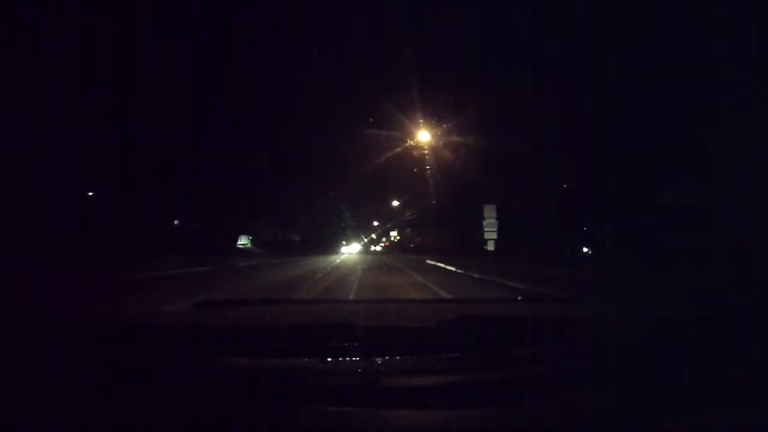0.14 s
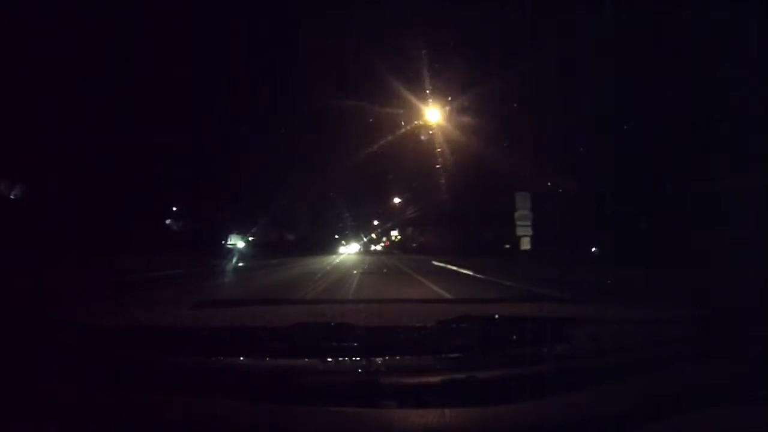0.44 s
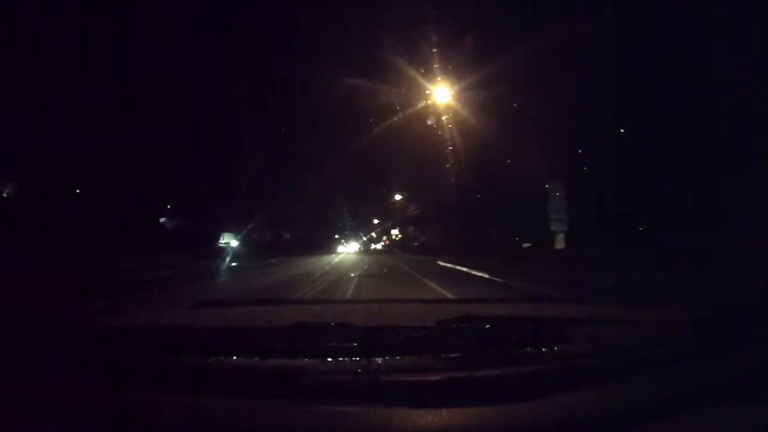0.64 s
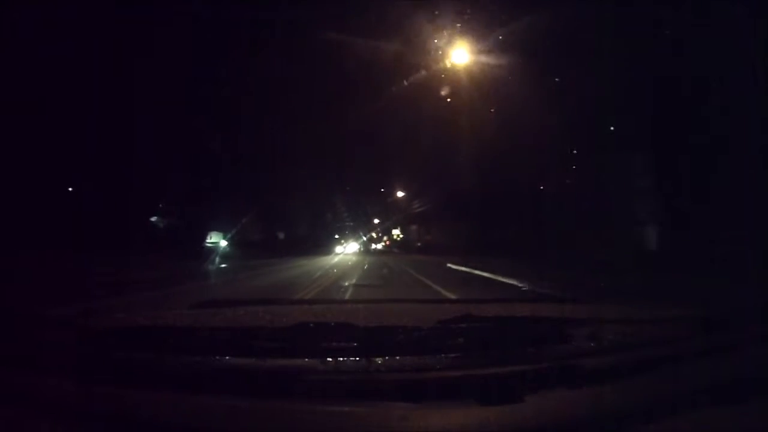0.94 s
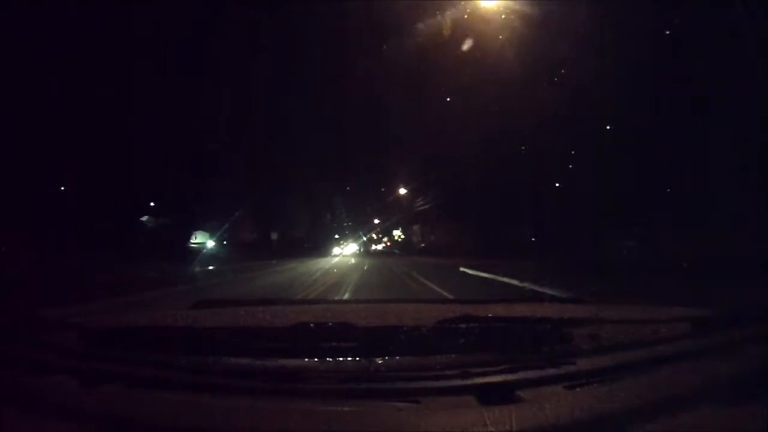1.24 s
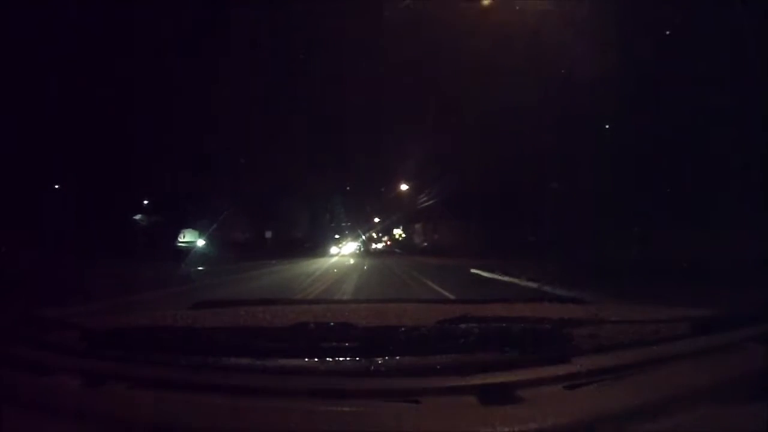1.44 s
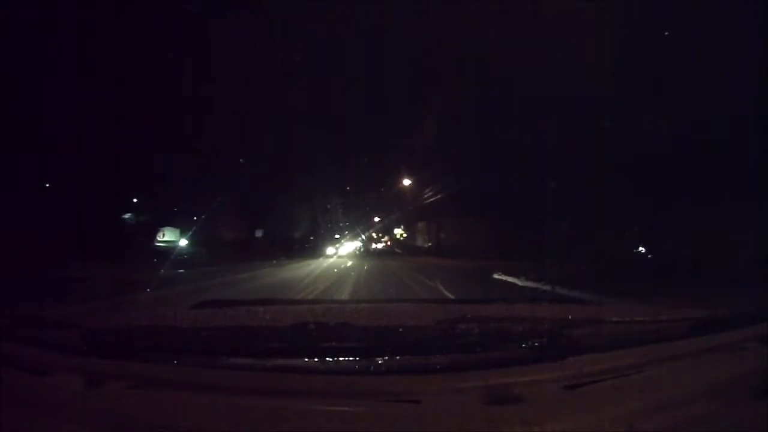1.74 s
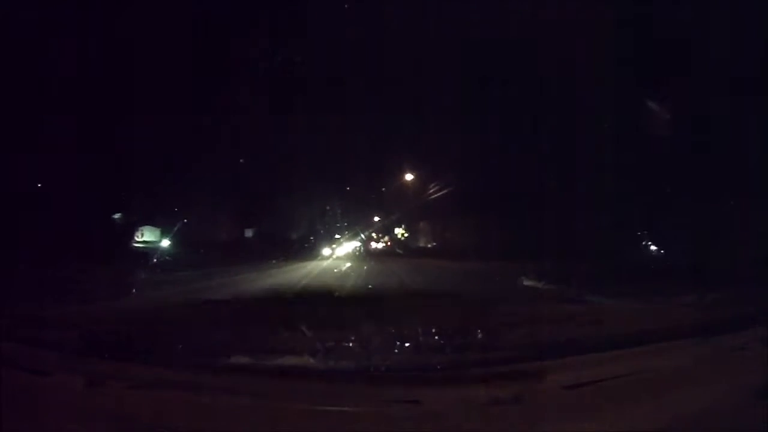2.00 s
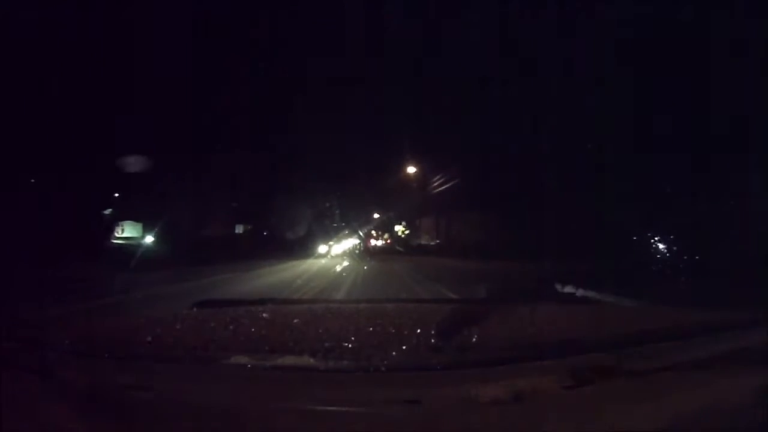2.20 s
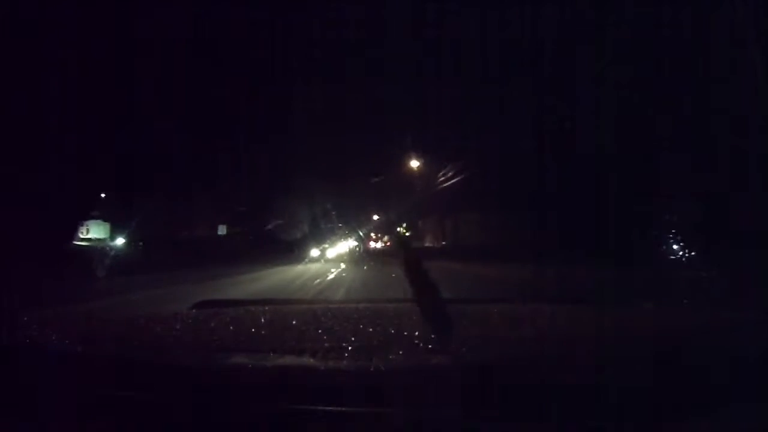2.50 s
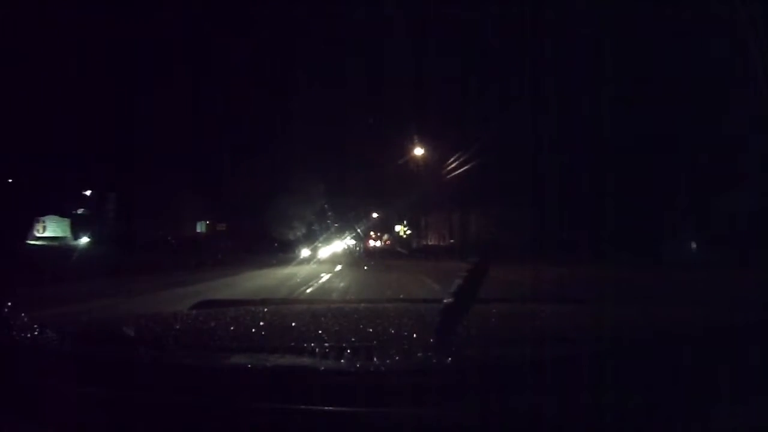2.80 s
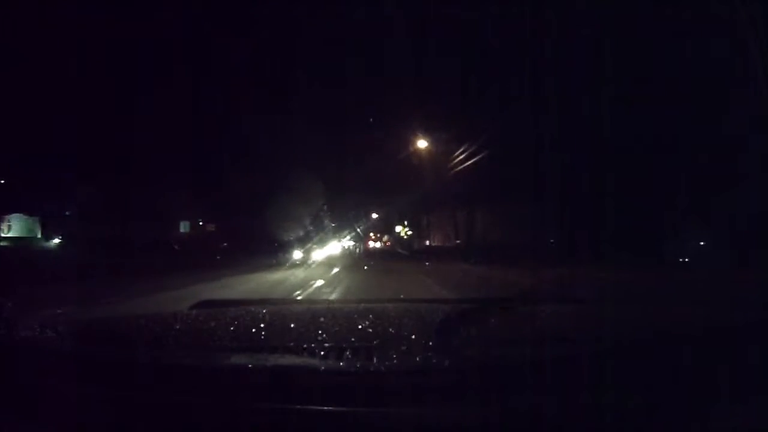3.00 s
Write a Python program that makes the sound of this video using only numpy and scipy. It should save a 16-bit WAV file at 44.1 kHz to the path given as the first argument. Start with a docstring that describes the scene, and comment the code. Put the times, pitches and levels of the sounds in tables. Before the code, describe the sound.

Inside a cruising car, a low engine hum sits under heavy tyre roar and boomy body rumble; two soft bumps thud around two seconds, with faint trim ticks, heard from a dashboard microphone.

```python
"""Inside a cruising car

The engine hums as orders 2 to 5 of its turning rate; it sags in speed and eases off near the end.
Tyre noise roars through cabin resonances, drones and shakes the body; two bumps push the cabin air.
Shaped noise makes the air hiss and the ticks and creaks of the trim. At the dashboard, a limiter ducks
after each peak, big bass swings are rounded off and a thin sizzle lies in the top treble.
"""
import sys
import numpy as np
from scipy import signal
from scipy.fft import rfft, irfft
from scipy.io import wavfile
from scipy.ndimage import uniform_filter1d

SR = 44100
rng = np.random.default_rng(int(sys.argv[2]) if len(sys.argv) > 2 else 0)


def file_out(sig):
    """Save sig as 16-bit WAV at sys.argv[1]."""
    # one column per channel
    cols = np.atleast_2d(sig).T
    # limit, then scale
    lim = np.clip(cols, -1, 1)
    pcm = np.round(lim * 32767).astype(np.int16)
    wavfile.write(sys.argv[1], SR, pcm)


N = 138915
TIME = np.arange(N) / SR  # s
FREQS = np.maximum(np.arange(N // 2 + 1) * SR / N, 1)  # Hz


def from_db(db):
    """Decibels to amplitude gain."""
    return 10 ** (np.asarray(db) / 20)


def in_time(rows):
    """Each column of a time curve, interpolated at every sample."""
    s, *columns = np.transpose(rows)
    return [np.interp(TIME, s, column) for column in columns]


def over_hz(points):
    """A spectrum in dB at every bin, interpolated over log frequency."""
    hz, db = np.transpose(points)
    return np.interp(np.log(FREQS), np.log(hz), db)


def bell(hz, width_hz, db):
    """A Gaussian peak or dip in dB, with its full width at half its dB height."""
    return db * .5 ** ((2 * (FREQS - hz) / width_hz) ** 2)


def noise(db_per_hz):
    """Steady Gaussian noise of the given spectral density."""
    white_spectrum = rfft(rng.standard_normal(N))
    return irfft(white_spectrum * from_db(db_per_hz) * np.sqrt(SR / 2), N)


def drift(rate_hz):
    """Low-passed random variation with a standard deviation of 1."""
    slow = irfft(rfft(rng.standard_normal(N)) / (1 + (FREQS / rate_hz) ** 2), N)
    return slow / slow.std()


def evened(x):
    """The same sound with its chance swells levelled by a twice-smoothed power."""
    window = int(0.15 * SR)  # 0.15 s
    power = uniform_filter1d(uniform_filter1d(x ** 2, window), window)
    return x * np.sqrt(np.mean(x ** 2) / power)


def engine():
    """Orders 2 to 5 of the crankshaft: sines at multiples of the turning rate."""
    # speed and order levels before trim: (time [s], turning rate [Hz],
    # order 2 [dB], order 3 [dB], order 4 [dB], order 5 [dB])
    speed_and_orders = [(0,27.4,-20.5,-24.5,-20.5,-33),(.12,28.25,-15.5,-20.5,-29,-39),(.48,28.68,-17,-19.5,-38,-38),(.78,28.4,-18,-22,-37.5,-35),(1.03,27.41,-24,-19,-29.5,-36),(1.4,27.86,-18.5,-20.5,-45,-39.5),(1.6,27.45,-19.5,-20.5,-34,-46),(1.7,26.4,-20,-17.5,-26.5,-28.5),(1.9,25.33,-22.5,-22,-23.5,-29),(2.19,25.09,-22.5,-22,-27.5,-26.5),(2.38,26.08,-22,-19.5,-23.5,-26.5),(2.55,27.55,-18.5,-20,-32,-49),(2.72,27.13,-35,-21,-27,-33),(2.88,25.6,-29,-44,-29.5,-29),(3.04,24.6,-37,-31,-43,-30),(3.15,24.9,-43,-32,-16,-28)]
    trims_db = [2, 2, 1, 1]
    turn_hz, *levels_db = in_time(speed_and_orders)
    turn_rad = 2 * np.pi * np.cumsum(turn_hz) / SR
    hum = 0
    for order, (level_db, trim_db) in enumerate(zip(levels_db, trims_db), start=2):
        start_rad = 2 * np.pi * rng.random()
        hum = hum + from_db(level_db + trim_db) * np.sin(order * turn_rad + start_rad)
    return hum


def tyre_roar():
    """Road texture excites cabin resonances, which waver in pitch as the roar runs early or late."""
    # tyre noise through the body: (frequency [Hz], density [dB per Hz])
    body_noise = [(150,-80),(260,-57.5),(370,-62.5),(620,-66),(950,-77),(1450,-78),(1650,-99.5),(3000,-110)]
    # cabin resonances: (frequency [Hz], width [Hz], lift [dB])
    cabin_modes = [(305.4,53,5),(429,46,4),(527,64,9),(695,47,7.5),(811,66,7),(892,49,5),(1083,80,8.5),(1174,52,9.5),(1349,146,8)]
    # roar strength, used relative to its mean: (time [s], level [dB])
    roar_level = [(0,-31),(.09,-33),(.16,-30),(.25,-31.5),(.35,-32.5),(.48,-31),(.72,-33),(.85,-32),(.92,-29.5),(1.05,-32.5),(1.16,-28.5),(1.24,-32.5),(1.42,-30),(1.54,-33),(1.66,-28.5),(1.8,-31),(1.9,-28.5),(1.99,-31.5),(2.08,-26.5),(2.21,-30.5),(2.3,-28.5),(2.46,-28),(2.52,-31),(2.66,-28),(2.8,-27.5),(2.87,-28.5),(2.95,-28),(3.15,-27.5)]
    flutter_db, flutter_hz = 0.84, 64
    waver_s, waver_hz = 0.0005, 4
    resonances_db = sum(bell(*mode) for mode in cabin_modes)
    roar = evened(noise(over_hz(body_noise) + resonances_db))
    roar = np.interp(TIME + waver_s * drift(waver_hz), TIME, roar)
    level_db, = in_time(roar_level)
    return roar * from_db(level_db - level_db.mean() + flutter_db * drift(flutter_hz))


def tyre_drone():
    """Low tyre noise, lifted around the resonance of the air inside the tyres."""
    # low tyre noise: (frequency [Hz], density [dB per Hz])
    drone_noise = [(50,-65),(100,-51),(150,-56),(235,-53),(300,-61.5),(500,-100)]
    # gain on that noise: (time [s], level [dB])
    drone_level = [(0,-4.5),(.3,-0.5),(.65,-7.5),(.95,-2),(1.23,-4.5),(1.41,-1.5),(1.53,-5.5),(1.68,1.5),(1.85,-0.5),(2.1,-1),(2.2,-3),(2.3,1.5),(2.55,-2),(2.72,-0.5),(2.98,-1.5),(3.09,2),(3.15,0)]
    cavity_db = bell(hz=189, width_hz=58, db=10.5)
    level_db, = in_time(drone_level)
    return evened(noise(over_hz(drone_noise) + cavity_db)) * from_db(level_db)


def body_shake():
    """The road shakes the body: deep noise that swells and sinks."""
    # body noise: (frequency [Hz], density [dB per Hz])
    shake_noise = [(8,-63),(17,-37),(27,-35.5),(42,-39),(62,-40.5),(95,-54),(150,-65),(400,-100)]
    # gain on that noise: (time [s], level [dB])
    shake_level = [(0,-11),(.23,-3),(.5,-5),(.85,-2),(1.07,2.5),(1.4,1.5),(1.65,-4),(1.9,-2),(2.17,-5),(2.35,-1),(2.55,-3),(2.95,-2.5),(3.15,-8)]
    level_db, = in_time(shake_level)
    return evened(noise(over_hz(shake_noise))) * from_db(level_db)


def bumps():
    """Each bump is a soft push of cabin air; the pressure leaks away with a slight rebound."""
    # pushes before the leak: (time [s], peak [dB])
    bump_peaks = [(1.969,-16),(2.1678,-0.5)]
    sigma_s, leak_hz = 0.0023, 10.2
    pushes = sum(from_db(db) * np.exp(-.5 * ((TIME - s) / sigma_s) ** 2) for s, db in bump_peaks)
    leak = signal.butter(1, leak_hz, "high", fs=SR, output="sos")
    return signal.sosfilt(leak, pushes + 1e-18)


def creaks():
    """Strength of tiny random creaks: each starts at once and decays exponentially."""
    rate_per_s, gain_db, decay_s = 45, -0.5, 0.002
    starts = (rng.random(N) < rate_per_s / SR) * rng.random(N)
    decay = np.exp(-1 / (decay_s * SR))
    return from_db(gain_db) * signal.lfilter([1], [1, -decay], starts + 1e-18)


def trim_ticks():
    """Ticks and creaks of the trim: short envelopes gate bright noise."""
    # ticks: (time [s], strength [dB])
    tick_strengths = [(0.186,1),(0.4115,-4),(0.421,-7),(0.4923,-6),(0.7706,0),(1.422,3.5),(1.9539,2),(2.0926,4.5),(2.1581,-1),(2.169,-1),(2.69,0),(2.780,2.5),(2.8779,4.5),(3.0736,3.5)]
    # noise in the ticks: (frequency [Hz], density [dB per Hz])
    tick_colour = [(800,-107),(2000,-81),(3500,-80.5),(5500,-76),(7500,-81),(10000,-93),(15000,-92)]
    attack_s, decay_s = 0.00093, 0.0046
    bursts = 0
    for s, db in tick_strengths:
        age = np.maximum((s - TIME) / attack_s, (TIME - s) / decay_s)
        bursts = bursts + from_db(db) * np.exp(-age)
    return noise(over_hz(tick_colour)) * (bursts + creaks())


def air_hiss():
    """Fluttering air noise."""
    # air noise: (frequency [Hz], density [dB per Hz])
    hiss_noise = [(400,-98.5),(1600,-80),(2800,-82),(5000,-85.5),(7000,-89),(8500,-91),(10300,-98.5),(13000,-111),(15200,-98)]
    # hiss strength, used relative to its mean: (time [s], level [dB])
    hiss_level = [(0,-50),(.05,-54),(.12,-48),(.28,-53),(.42,-50.5),(.68,-51.5),(.92,-48.5),(1.03,-51),(1.13,-46.5),(1.25,-50),(1.42,-48),(1.5,-52),(1.68,-47.5),(1.92,-47.5),(2.0,-52),(2.08,-46),(2.22,-51),(2.34,-47),(2.56,-48.5),(2.8,-48),(3.15,-47)]
    flutter_db, flutter_hz = 1.22, 45
    level_db, = in_time(hiss_level)
    gain_db = level_db - level_db.mean() + flutter_db * drift(flutter_hz)
    return noise(over_hz(hiss_noise)) * from_db(gain_db)


def limiter(x):
    """Peaks over the limit pull the gain down a moment later; it recovers at a steady dB rate."""
    limit_db, duck_db_per_db, max_duck_db = -7.5, 1.5, 6.5
    lag_s, smoothing_s, release_db_per_s = 0.0075, 0.0007, 80
    level_db = 20 * np.log10(np.abs(x) + 1e-9)
    duck_db = np.clip(duck_db_per_db * (level_db - limit_db), 0, max_duck_db)
    release_db = release_db_per_s * TIME
    held_db = np.maximum.accumulate(duck_db + release_db) - release_db
    late_db = np.interp(TIME - lag_s, TIME, held_db)
    r = np.exp(-1 / (smoothing_s * SR))
    return x * from_db(-signal.lfilter([1 - r], [1, -r], late_db))


def bass_overload(x):
    """The biggest bass swings are rounded off; the treble rides over them."""
    bass_hz, top = 400, 0.54  # top: full-scale amplitude
    bass = irfft(rfft(x) / (1 + (FREQS / bass_hz) ** 4), N)
    rounded = bass / (1 + (bass / top) ** 10) ** (1 / 10)
    return x - bass + rounded


def sizzle(x):
    """The slope of the low sound, mirrored on both sides of a high carrier."""
    carrier_hz, reach_hz, gain_db = 12000, 1830, 1.5
    low = signal.sosfilt(signal.butter(4, reach_hz, fs=SR, output="sos"), x)
    return from_db(gain_db) * np.gradient(low) * np.sin(2 * np.pi * carrier_hz * TIME)


def scene():
    """Everything heard at the dashboard, in one channel."""
    road = tyre_roar() + tyre_drone() + body_shake() + bumps()
    return (engine() + road + trim_ticks() + air_hiss())[None]


def record(dry):
    """Limiter, bass overload, sizzle, the microphone's notch and a steep cut at the top."""
    cutoff_hz = 15350
    x = bass_overload(limiter(dry[0]))
    notch = from_db(bell(hz=5980, width_hz=840, db=-12.5))
    low_pass = 1 / np.sqrt(1 + (FREQS / cutoff_hz) ** 600)
    return irfft(rfft(x + sizzle(x)) * notch * low_pass, N)[None]


dry = scene()
out = record(dry)
file_out(out)
```